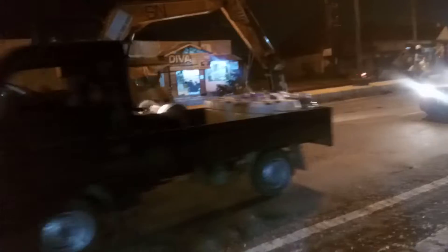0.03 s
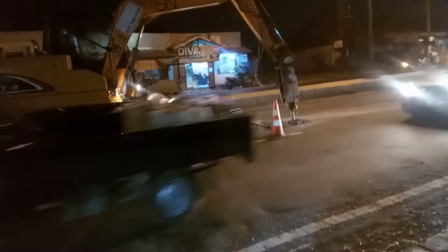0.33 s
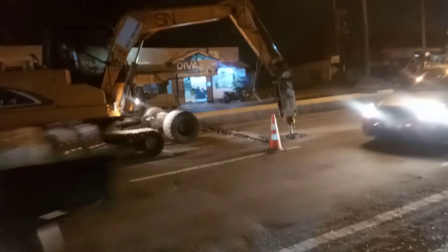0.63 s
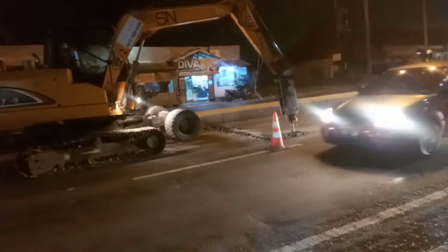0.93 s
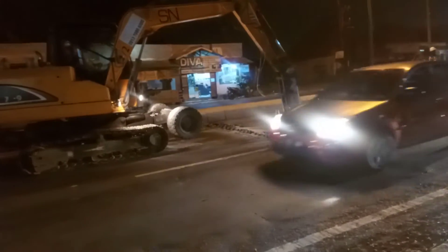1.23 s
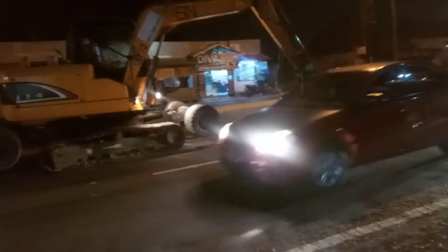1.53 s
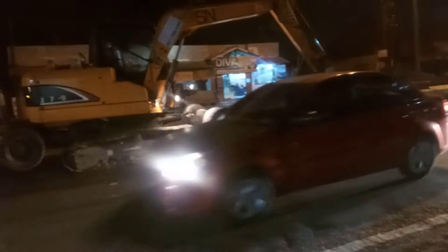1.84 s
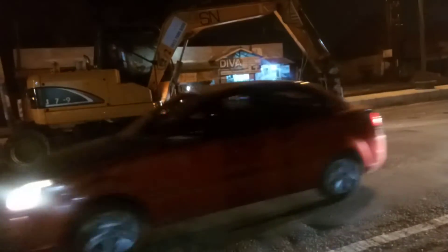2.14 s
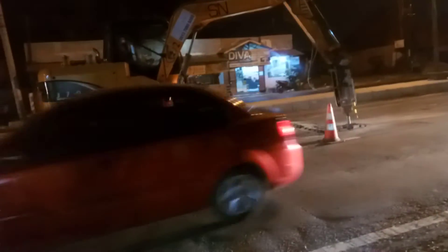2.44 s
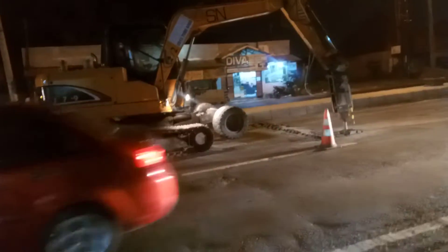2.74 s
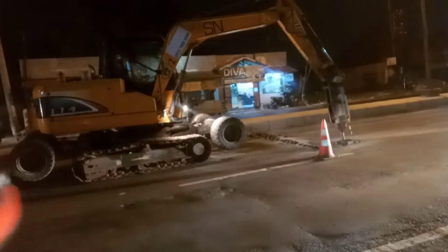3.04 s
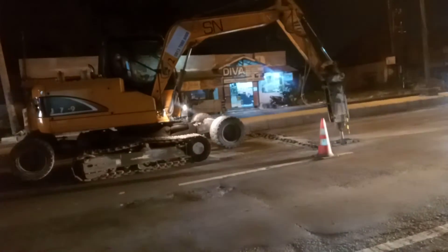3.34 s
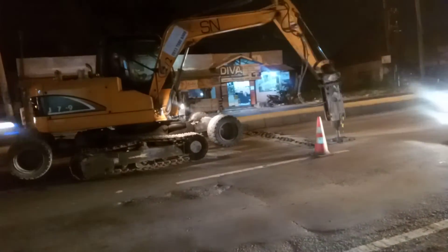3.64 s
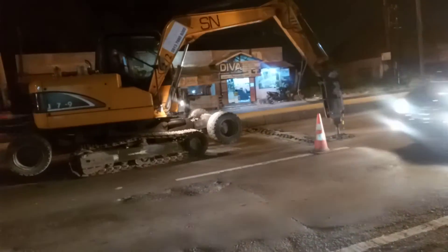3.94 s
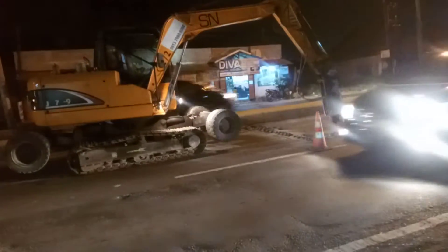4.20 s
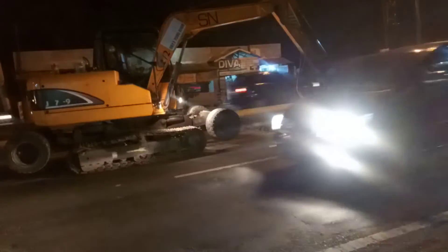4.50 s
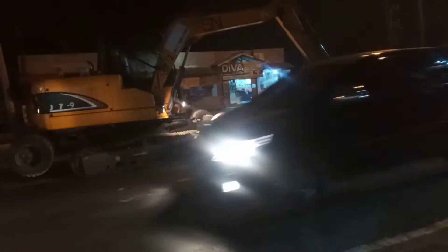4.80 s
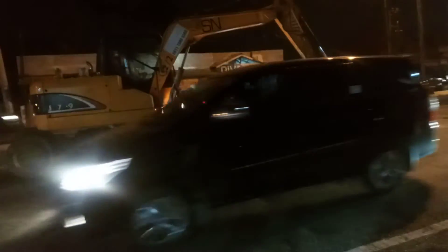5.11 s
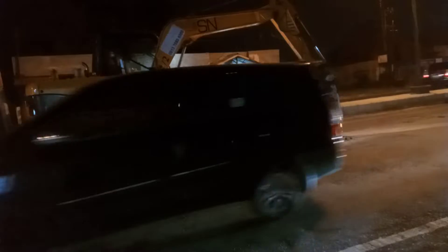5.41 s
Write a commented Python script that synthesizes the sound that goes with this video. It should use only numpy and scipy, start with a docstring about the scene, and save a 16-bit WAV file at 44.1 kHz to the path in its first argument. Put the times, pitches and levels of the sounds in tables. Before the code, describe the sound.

An excavator's hydraulic breaker pounds a street without pause, nearly twelve blows a second. Each blow is a bright steel crack with a low thump, metallic ringing and quick echoes off the buildings. A faint diesel drone lies underneath. Three vehicles pass close to the microphone, at the start, around two seconds and near the end, their engines and tyres swelling softly under the hammering.

```python
"""A night street fades in: an excavator's hydraulic breaker pounds the road, nearly twelve blows a second,
while its diesel drones and a car goes by. Each blow is a valve click, then a thump and a steel crack with
a hollow knock, then echoes from the road and house fronts. The chisel and the boom (the arm) ring on.
Near 2 s the chisel bites in and the beat quickens a touch. A car passes then, and another near 5 s:
each first blocks some of the crack, then throws back stronger echoes as it comes close."""
import sys
import numpy as np
from scipy import signal
from scipy.fft import rfft, irfft
from scipy.io import wavfile
from scipy.ndimage import uniform_filter1d

SR = 44100
rng = np.random.default_rng(int(sys.argv[2]) if len(sys.argv) > 2 else 0)


def int16_out(signal):
    """Quantize to a 16-bit WAV file."""
    q = np.round(np.clip(np.atleast_2d(signal).T, -1, 1) * 32767)
    wavfile.write(sys.argv[1], SR, q.astype(np.int16))


N = 245195
TIME_S = np.arange(N) / SR
SIZE = 16384   # samples in the sound of one blow
AGE_S = np.arange(SIZE) / SR
PITCH_HZ = np.arange(SIZE // 2 + 1) * SR / SIZE

# the piston's beat, before and after the chisel has bitten in
FIRST_BLOW_S, START_GAP_S, BITTEN_S, BITTEN_GAP_S = .1468, .08653, 2.0506, .0860
BLOW_S = np.r_[np.arange(FIRST_BLOW_S, BITTEN_S - START_GAP_S / 2, START_GAP_S),
               np.arange(BITTEN_S, N / SR - BITTEN_GAP_S / 2, BITTEN_GAP_S)]


# how the chisel meets the road: time_s, force_db, knock_db, housing_bark_db, high_ring_db
CONTACT = [(0.15, -20.5, -18, -4.5, -1), (0.75, -17, -23, -4, 3.5), (1.1, -16.3, -28, -3, 1),
           (1.35, -18, -17, -2.5, -1), (2.15, -17.8, -17.5, 0, -4), (2.52, -19.8, -15.5, -2, -5),
           (2.7, -16.8, -17, -2.5, -7), (3.05, -18.8, -15.5, -3.5, -2.5), (3.85, -19.8, -19.5, -6, -5),
           (4.25, -18.3, -18.5, -3.5, -5), (4.65, -20, -23, 0, -1), (5.0, -20.5, -30, -3, -3.5),
           (5.5, -18.5, -22, -2, 0)]

def breaker():
    """The valve shifts, the piston hits the chisel, the road thuds, and the street answers twice."""
    times = BLOW_S + .00022 * rng.standard_normal(len(BLOW_S))
    force_db, knock_db, bark_db, ring_db = at_blows(CONTACT)
    crack_db = force_db + past_cars(clear_db=1.66, hidden_db=-5.8, close_db=-.2)
    thump_db = force_db + past_cars(clear_db=-8.6, hidden_db=.8, close_db=4)
    echo_db = past_cars(clear_db=-23.5, hidden_db=-2, close_db=4)
    treble_db = past_cars(clear_db=-1.2, hidden_db=-1.9, close_db=2.8)
    tone = treble_ripple() * bite(bark_db)
    direct_tone = tone * treble_gain(treble_db) * peak_gain(ring_db, hz=2020, width_hz=150)
    return (valve_click(times, crack_db - 14, direct_tone)
            + steel_crack(times, crack_db, direct_tone)
            + hollow_knock(times, knock_db - 5, tone)
            + echoes(times, echo_db, tone)
            + chisel_ring(times, (crack_db + echo_db) / 2 + .29 * ring_db + .9)
            + road_thump(times, thump_db))


def steel_crack(times, level_db, tone):
    """The piston's hit shakes the whole steel body in one bright burst."""
    colour_db = steel_colour(sharpness=.78, tilt_db_per_octave=.87, clang_db=-.3)
    return on_blows(times, bursts(colour_db, tone, rise_s=.00047, decay_s=.11), level_db)


# the overall colour (balance of low and high) of struck steel: pitch_hz, level_db
STEEL_COLOUR = [(60, -17.5), (140, -2.5), (280, -1.5), (430, -2), (600, -5.5), (1000, -11.5), (1500, -7.5),
                (2200, -8.5), (3300, -7), (4400, -10.5), (6000, -12), (7900, -14), (9700, -29),
                (12000, -30.5), (15500, -31)]
# pitches at which the breaker's housing rings: pitch_hz, width_hz, boost_db
HOUSING_PEAKS = [(734, 52, 7.5), (868, 137, 9.5), (1062, 47, 10.5), (1138, 50, 6), (1278.4, 58, 17),
                 (1360, 171, 18), (1640, 89, 11), (1750, 58, 5), (2011, 112, 15.5), (2440, 150, 9),
                 (2596, 34, 6), (2895, 105, 8), (3060, 32, 9), (3360, 82, 7.5), (3824, 110, 10),
                 (3967, 150, 7.5), (5200, 81, 0), (5320, 110, 2), (6100, 160, -1), (7170, 220, 7.5),
                 (7970, 110, 7), (11400, 450, 5.5), (14300, 662, 3)]

def steel_colour(sharpness, tilt_db_per_octave, clang_db):
    """The struck breaker's level at each pitch: housing peaks and a broad clang on a slope."""
    peaks = sum(db / (1 + (2 * (PITCH_HZ - hz) / width) ** 2) for hz, width, db in HOUSING_PEAKS)
    clang = clang_db / (1 + ((PITCH_HZ - 3200) / 700) ** 2)
    tilt = tilt_db_per_octave * np.log2(np.maximum(PITCH_HZ, 200) / 2000)
    return at_pitches(STEEL_COLOUR) + sharpness * peaks + clang + tilt


# the middle of the sinking clang: time_s, pitch_hz
CLANG_PATH = [(1.1, 3930), (2.1, 3200), (4.7, 3300), (5.1, 2090)]

def bite(bark_db):
    """Tone of each blow: a clang sinks as the chisel goes in, and the housing's bark comes and goes."""
    clang_hz, = at_blows(CLANG_PATH)
    return peak_gain(db=3, hz=clang_hz, width_hz=300) * peak_gain(bark_db, hz=1330, width_hz=280)


# the colour of the valve's click: pitch_hz, level_db
VALVE_COLOUR = [(500, -21), (2600, -31), (3500, 4), (4400, 5), (7900, 4), (9700, -15), (15000, -6.5)]

def valve_click(times, level_db, tone):
    """The valve shifts with a thin click just before the piston lands."""
    clicks = bursts(at_pitches(VALVE_COLOUR), tone, rise_s=.00066, decay_s=.031)
    return on_blows(times, clicks, level_db, delay_s=-.0118)


# the colour of the knock: pitch_hz, level_db
KNOCK_COLOUR = [(400, -15), (710, -13), (865, 5), (1005, -16), (1280, 7), (1400, 5), (1600, -11),
                (2400, -36)]

def hollow_knock(times, level_db, tone):
    """The chisel meets the road with a short, hollow knock."""
    knocks = bursts(at_pitches(KNOCK_COLOUR), tone, rise_s=.00047, decay_s=.02)
    return on_blows(times, knocks, level_db, delay_s=.0022)


# the chisel's own notes: pitch_hz, level_db, decay_s
CHISEL_NOTES = [(699, -22, 0.53), (808, -20, 0.48), (1033, -17, 0.45), (1257, -11.5, 0.39),
                (1400, -37, 0.25), (1956, -14, 0.68), (2004, -12.5, 0.62), (2428, -14, 0.19),
                (3213, -5.5, 0.089), (3500, -32, 0.19), (3820, -16, 0.13), (4260, -13.5, .11),
                (7500, -31, 0.098)]

def chisel_ring(times, level_db):
    """The chisel rings after each blow; it shifts in its seat, so each note grows and shrinks."""
    notes = np.array([from_db(db - 60 * AGE_S / decay_s) * np.sin(2 * np.pi * hz * AGE_S)
                      for hz, db, decay_s in CHISEL_NOTES])
    seat_db = 1.8 * scatter(alike=.8)[:, :len(CHISEL_NOTES)]
    return on_blows(times, from_db(seat_db) @ notes, level_db, delay_s=.000994)


# the colour of the road's thump: pitch_hz, level_db
THUMP_COLOUR = [(50, -27.5), (100, -7), (165, 5.5), (235, -1.5), (310, -3.5), (420, -16), (900, -40.5)]

def road_thump(times, level_db):
    """The road gives the same low pulse at every blow, followed by a quieter echo."""
    pulse = irfft(colour_filter(at_pitches(THUMP_COLOUR)))
    pulse /= np.sqrt(np.mean(pulse[AGE_S < .011] ** 2))
    thumps = [pulse] * len(times)
    return (on_blows(times, thumps, level_db, delay_s=-.00086)
            + on_blows(times, thumps, level_db - 9.5, delay_s=.0173))


# the boom's lesser notes: pitch_hz, decay_s, quiet_db, singing_db, start_s, end_s
BOOM_NOTES = [(404.9, .15, -48, -35, 0.15, 2.43), (452.6, 0.84, -45, -36.5, 1.8, 3.37),
              (764.5, .16, -47, -35, 0.3, 1.54), (851, 0.13, -46, -38, 2.6, 4.76)]
# how loud the boom's strongest note is: time_s, level_db
WHINE_LEVELS = [(0.1, -38), (1.55, -39.5), (1.97, -25), (2.5, -38.5), (3.15, -31.5), (4.15, -31.5),
                (4.45, -42), (4.8, -28), (5.56, -39)]

def boom():
    """Under one strong whine, the boom's lesser notes sing out while the chisel's seat suits them."""
    lesser, changeover_s = np.zeros(N), .085
    for hz, decay_s, quiet_db, singing_db, start_s, end_s in BOOM_NOTES:
        singing = (np.tanh((TIME_S - start_s) / changeover_s)
                   - np.tanh((TIME_S - end_s) / changeover_s)) / 2
        level_db = quiet_db + (singing_db - quiet_db) * singing
        lesser += boom_note(hz, decay_s, swell_db=4.5) * from_db(level_db)
    lesser *= from_db(past_cars(clear_db=0, hidden_db=-5, close_db=4, t=TIME_S))
    whine_db = np.interp(TIME_S, *np.transpose(WHINE_LEVELS))
    return lesser + boom_note(hz=498.5, decay_s=1, swell_db=4) * from_db(whine_db)


def boom_note(hz, decay_s, swell_db):
    """Blows come faster than the note dies, so it sings on, swelling between them."""
    kicks = np.zeros(N)
    kicks[(BLOW_S * SR).astype(int)] = from_db(.82 * rng.standard_normal(len(BLOW_S)))
    beat = np.interp(TIME_S, BLOW_S, np.arange(len(BLOW_S)))
    swell = from_db(swell_db * np.cos(2 * np.pi * (beat - .55)))   # loudest just past mid-beat
    fade, turn = from_db(-60 / (decay_s * SR)), 2 * np.pi * hz / SR   # per sample
    ring = swell * signal.lfilter([0, np.sin(turn)], [1, -2 * fade * np.cos(turn), fade ** 2],
                                  kicks + 1e-18)
    slow_power = np.abs(uniform_filter1d(ring ** 2, size=11400))
    return ring / np.sqrt(slow_power + 1e-3)   # evens out slow changes in level


def echoes(times, first_db, tone):
    """The street throws each blow back twice; the later echo comes off the sides of nearby cars."""
    reach_s = .91   # how long before and after its nearest point a car reflects well
    reflecting = sum(np.exp(-((BLOW_S - nearest_s) / reach_s) ** 2) for nearest_s, *_ in PASSING_CARS)
    second_db = -25.5 + 10 * np.log10(reflecting)
    tone = tone * treble_gain(past_cars(clear_db=-1.5, hidden_db=-.5, close_db=4.5))
    first_colour = steel_colour(sharpness=.88, tilt_db_per_octave=.76, clang_db=-6)
    second_colour = steel_colour(sharpness=.61, tilt_db_per_octave=-.5, clang_db=0)
    first = bursts(first_colour, tone, rise_s=.0009, decay_s=.12)
    second = bursts(second_colour, tone, rise_s=.00053, decay_s=.22)
    return (on_blows(times, first, first_db, delay_s=.0175)
            + on_blows(times, second, second_db, delay_s=.037))


def treble_ripple():
    """Short sound waves add up and cancel on their way, so the treble shifts from blow to blow."""
    rough = scatter(alike=.96)[:, :len(PITCH_HZ)]
    ripple = rms_one(uniform_filter1d(uniform_filter1d(rough, size=40), size=40))
    return from_db(2.2 * ripple * np.clip((PITCH_HZ - 2500) / 2000, 0, 1))


# the colours of engine rumble, tyre roar and tyre hiss: pitch_hz, level_db
RUMBLE_COLOUR = [(45, -38), (70, -11), (110, -0.5), (170, -9.5), (230, -8.5), (330, -8.5), (450, -9.5),
                 (600, -12.5), (900, -58)]
ROAR_COLOUR = [(200, -44), (350, -9), (620, -11.5), (1150, -5.5), (1290, -4), (1500, -5), (2000, -9),
               (2200, -10.5), (3300, -10.5), (4500, -28), (6000, -40)]
HISS_COLOUR = [(2060, -30), (3500, -2), (3900, -0.5), (4530, -27), (6100, -10), (7140, -5), (8050, -11.5),
               (10000, -23), (14600, -25), (15800, -31)]
# cars passing in front: nearest_s, half_pass_s, hiding_s, half_hiding_s, rumble_db, roar_db, hiss_db
PASSING_CARS = [(0.4, 0.36, -1, .22, -33.5, -26.5, -39), (2.08, 0.26, 1.62, .38, -32.5, -26.5, -33),
                (5.29, .16, 4.8, .39, -27.5, -24, -31)]

def traffic():
    """Each car's engine and tyres swell and fade, over distant traffic that the car briefly blocks."""
    colours, distant_db = (RUMBLE_COLOUR, ROAR_COLOUR, HISS_COLOUR), (-42, -33.5, -40)
    out = np.zeros(N)
    for colour, far_db, cars_db in zip(colours, distant_db, np.transpose(PASSING_CARS)[-3:]):
        far_power = from_db(far_db - 7 * hidden(TIME_S)) ** 2
        near_power = from_db(cars_db) ** 2 @ closeness(TIME_S)
        out += noise(colour) * np.sqrt(far_power + near_power)
    return out


def closeness(t):
    """Sound power falls with distance squared: one row per car, 1 when it is nearest."""
    return np.array([1 / (1 + ((t - nearest_s) / half_s) ** 2) for nearest_s, half_s, *_ in PASSING_CARS])


def hidden(t=BLOW_S):
    """How much the cars hide the breaker, from 0 to 1: sound shadows with soft edges."""
    shadows = sum(np.exp(-((t - hiding_s) / half_s) ** 4) for _, _, hiding_s, half_s, *_ in PASSING_CARS)
    return np.minimum(shadows, 1)


def past_cars(clear_db, hidden_db, close_db, t=BLOW_S):
    """Level in dB as a car first blocks a sound, then bounces it between its floor and the road."""
    return clear_db + hidden_db * hidden(t) + close_db * closeness(t).sum(axis=0)


# the colour of the excavator's engine: pitch_hz, level_db
DIESEL_COLOUR = [(20, -34), (42, -38), (55, -29), (62, -3), (66, 8), (70, -5), (80, -13), (95, -21),
                 (140, -52)]

def diesel():
    """The engine works at a steady load, so its low drone is fairly even; a close car lifts it."""
    drone = noise(DIESEL_COLOUR)
    even = rms_one(drone / np.sqrt(uniform_filter1d(drone ** 2, size=2600) + .19))
    return even * from_db(-43 + 3 * closeness(TIME_S).sum(axis=0))


def bursts(colour_db, tone, rise_s, decay_s):
    """One burst of noise per blow, dying by 60 dB in decay_s; all start equally strong."""
    # sound that bends round a car arrives with a softer edge
    attack = 1 - np.exp(-AGE_S / (rise_s + .0022 * hidden()[:, None]))
    spectra = rfft(scatter(alike=.94) * attack * from_db(-60 * AGE_S / decay_s))
    # flatten the noise's chance humps, so the colour is the struck body's own
    power, low_share = np.abs(spectra) ** 2, 1 / (1 + (PITCH_HZ / 3000) ** 4)
    narrow, wide = uniform_filter1d(power, size=45), uniform_filter1d(power, size=300)
    spectra /= np.sqrt(low_share * narrow + (1 - low_share) * wide + 1e-12)
    trimmed = irfft(spectra * tone) * (AGE_S < AGE_S[-1] * .8) * attack
    sounds = irfft(rfft(trimmed) * colour_filter(colour_db))
    return sounds / np.sqrt(np.mean(sounds[:, AGE_S < .016] ** 2))


def scatter(alike):
    """A random pattern for each blow, much like the one before; it changes faster behind a car."""
    patterns, keep = rng.standard_normal((len(BLOW_S), SIZE)), alike - .25 * hidden()
    for k in range(1, len(patterns)):
        patterns[k] = keep[k] * patterns[k - 1] + np.sqrt(1 - keep[k] ** 2) * patterns[k]
    return patterns


def on_blows(times, sounds, level_db, delay_s=0):
    """Place one sound at each blow; a negative delay puts it early."""
    out = np.zeros(N + 2 * SIZE)
    for blow_s, sound, gain in zip(times, sounds, from_db(level_db)):
        start = max(int((blow_s + delay_s) * SR), 0)
        out[start:start + SIZE] += gain * sound
    return out[:N]


def at_blows(rows):
    """Read each column of a timed table at every blow."""
    time_s, *columns = np.transpose(rows)
    return [np.interp(BLOW_S, time_s, column) for column in columns]


def at_pitches(colour, hz=PITCH_HZ):
    """Read a colour table's level at each pitch, with octaves evenly spaced."""
    table_hz, db = np.transpose(colour)
    return np.interp(np.log(np.maximum(hz, 1)), np.log(table_hz), db)


def peak_gain(db, hz, width_hz):
    """Gain per blow that lifts or lowers the sound around one pitch."""
    offset = (PITCH_HZ - np.reshape(hz, (-1, 1))) / width_hz
    return from_db(np.reshape(db, (-1, 1)) / (1 + offset ** 2))


def treble_gain(db):
    """Gain per blow that brightens or dulls everything above about 4 kHz."""
    return from_db(np.outer(db, 1 - 1 / (1 + (PITCH_HZ / 4300) ** 6)))


def colour_filter(db):
    """A filter with these levels that lets nothing sound before its cause (minimum phase)."""
    cepstrum = irfft(np.log(from_db(db)))
    cepstrum[1:SIZE // 2] *= 2
    cepstrum[SIZE // 2 + 1:] = 0
    return np.exp(rfft(cepstrum))


def noise(colour):
    """Steady noise of a given colour."""
    hz = np.arange(N // 2 + 1) * SR / N
    return rms_one(irfft(rfft(rng.standard_normal(N)) * from_db(at_pitches(colour, hz)), N))


def from_db(db):
    """Turn decibels into a gain to multiply by."""
    return 10 ** (np.asarray(db) / 20)


def rms_one(x):
    """Scale to an average strength (rms) of 1."""
    return x / np.sqrt(np.mean(x ** 2) + 1e-20)


def scene():
    """Breaker, boom, diesel and traffic in one channel."""
    return (breaker() + boom() + diesel() + traffic())[None]


def record(dry):
    """The microphone drops the deep bass, opens and fades in; peaks are rounded and the top is cut."""
    open_s, fade_s, bass_cut_hz, top_cut_hz = .112, (.09, .47), 54, 15900
    thin = signal.sosfilt(signal.butter(6, bass_cut_hz, "high", fs=SR, output="sos"), dry)
    opened = thin * np.interp(TIME_S, fade_s, [0, 1]) * (TIME_S > open_s)
    rounded = opened / (1 + (opened / .66) ** 4) ** .25
    return signal.sosfilt(signal.ellip(12, .1, 80, top_cut_hz, fs=SR, output="sos"), rounded)


dry = scene()
out = record(dry)
int16_out(out)
```